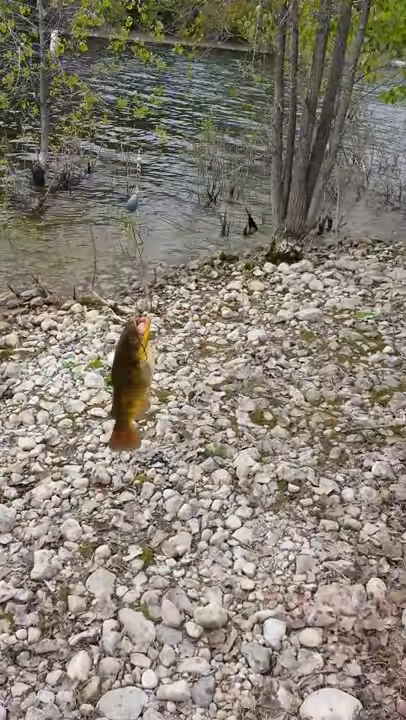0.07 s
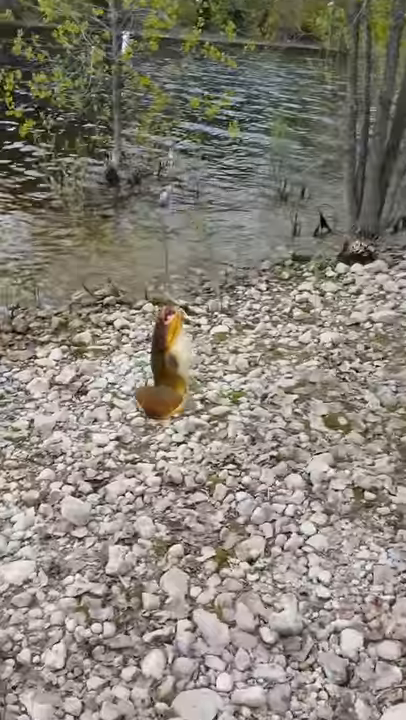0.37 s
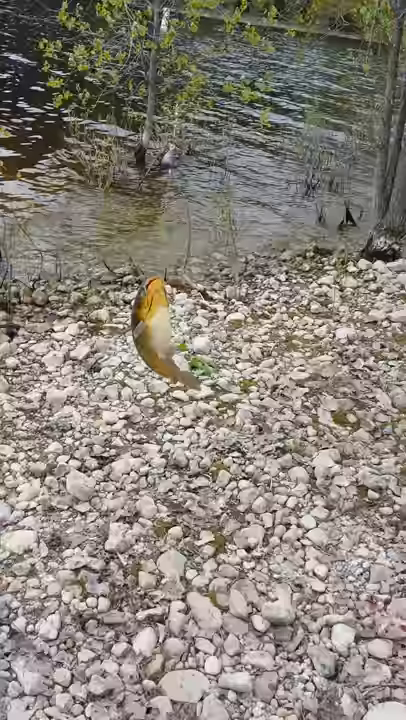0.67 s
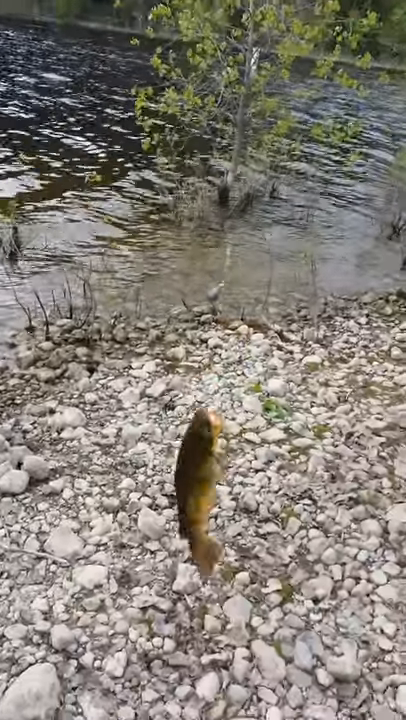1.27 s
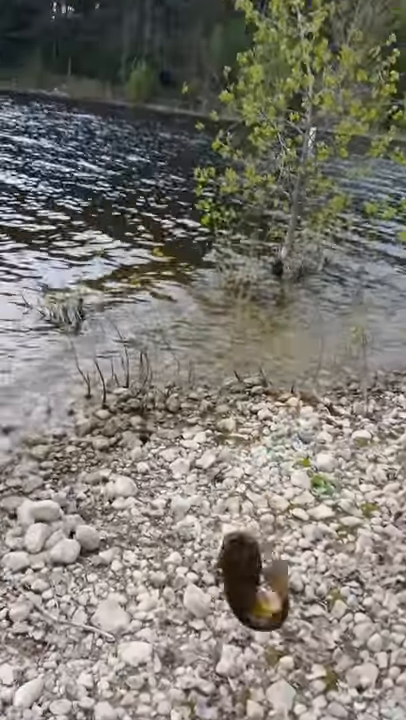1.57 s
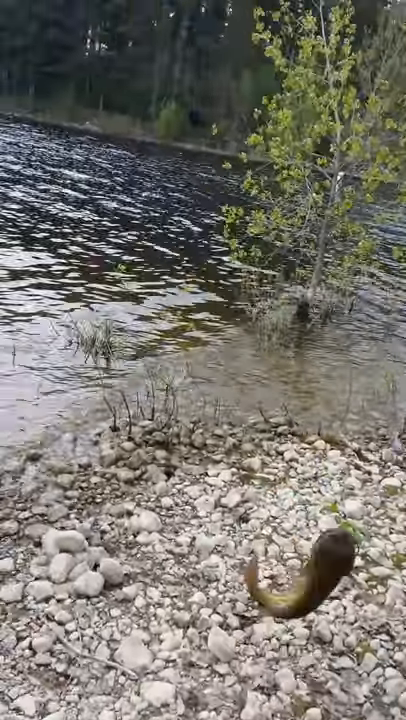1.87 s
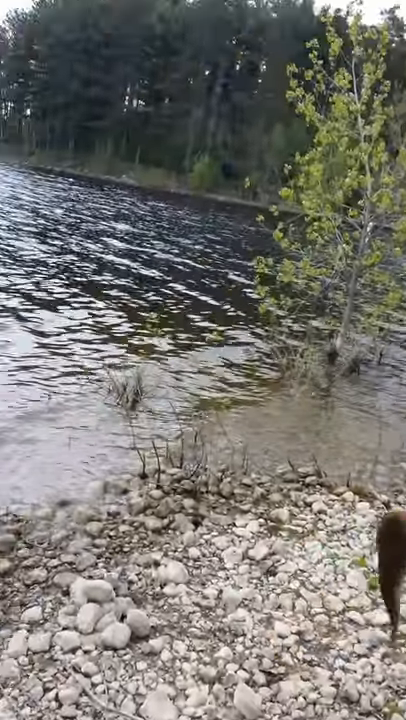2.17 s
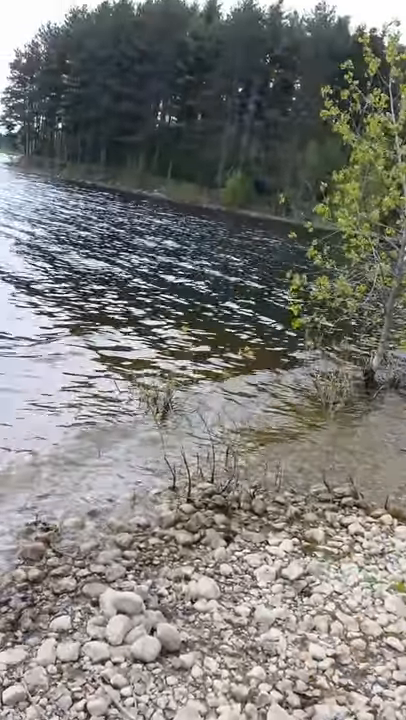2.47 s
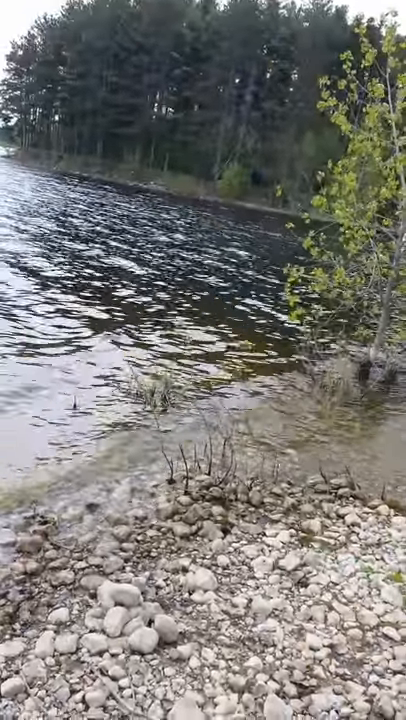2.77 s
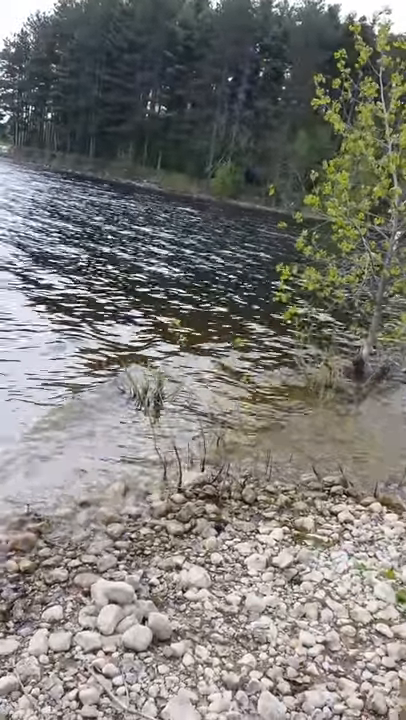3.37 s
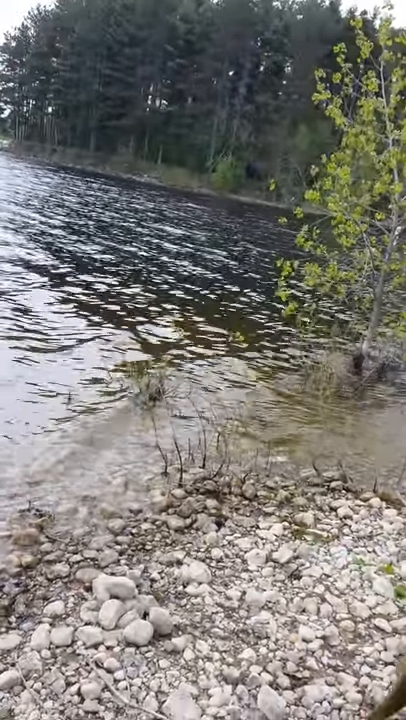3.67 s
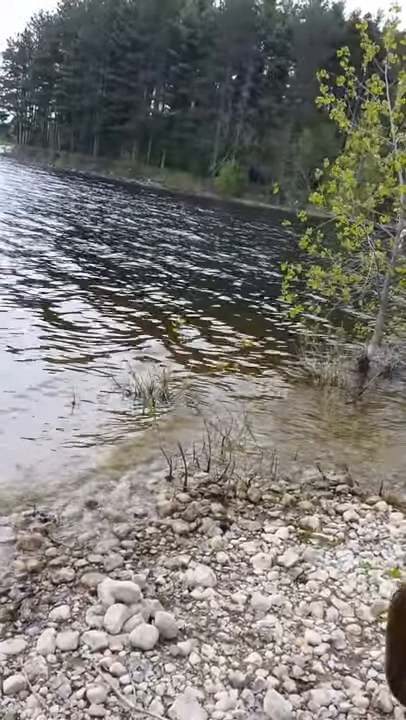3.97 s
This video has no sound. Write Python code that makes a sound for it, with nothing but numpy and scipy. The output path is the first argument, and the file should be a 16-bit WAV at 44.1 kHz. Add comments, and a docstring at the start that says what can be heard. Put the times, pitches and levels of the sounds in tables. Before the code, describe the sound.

A small fishing rod bell jingles irregularly over wind buffeting and softly lapping water.

```python
"""Rod bell on a windy lake shore

A hooked fish swings on a line and shakes the small bell clipped to the rod. Each blow of the pellet
excites the shell's normal modes, which decay freely; between rings the bell clatters drily on its clip.
Wind turbulence buffets the microphone, strongly from about one second on. Behind it, wavelets lap
and hiss on the pebbles, and small air bubbles resonate in the water."""
import sys
import numpy as np
from scipy import signal
from scipy.fft import rfft, irfft, next_fast_len
from scipy.io import wavfile
from scipy.ndimage import uniform_filter1d, map_coordinates

SR = 44100
rng = np.random.default_rng(int(sys.argv[2]) if len(sys.argv) > 2 else 0)


def dump(signal):
    """Clip the signal to [-1, 1] and save it as 16-bit WAV at the path in sys.argv[1]."""
    limited = np.clip(np.atleast_2d(signal).T, -1, 1)
    pcm = np.round(limited * 32767).astype(np.int16)
    wavfile.write(sys.argv[1], SR, pcm)


N = 176400

# Pellet blows: t/s, level/dB of each mode family (hum, low, middle, main, upper),
# lean/dB towards the higher mode of a split pair. Levels in all tables are relative.
PELLET_STRIKES = [(0.2445, -48, -32, -43, -17, -47, -7), (0.2875, -55, -34, -55, -25, -44, -4),
                  (0.7198, -55, -55, -42, -36, -55, 6), (0.9764, -38, -15, -26, -18, -23, -14),
                  (1.169, -55, -51, -29, -15, -34, 10), (1.2865, -55, -30, -55, -55, -48, -2),
                  (1.4437, -35, -35, -38, -16, -34, 2), (1.5298, -48, -25, -32, -19, -29, 2),
                  (1.5795, -55, -48, -31, -16, -32, 2), (1.619, -46, -42, -35, -32, -49, 10),
                  (1.7003, -47, -26, -39, -21, -33, -6), (1.7157, -40, -25, -31, -37, -29, -13),
                  (1.8475, -30, -23, -32, -18, -26, 2), (1.946, -55, -18, -34, -15, -23, 0),
                  (1.9715, -48, -23, -47, -16, -23, -14), (2.0353, -55, -41, -53, -40, -50, -4),
                  (2.3464, -49, -22, -27, -18, -21, 7), (2.4245, -55, -51, -54, -27, -46, 0),
                  (2.6635, -37, -19, -27, -17, -27, 7), (2.691, -39, -43, -25, -17, -21, 12),
                  (2.7475, -54, -39, -55, -33, -39, 7), (2.994, -55, -48, -40, -15, -35, 4),
                  (3.068, -51, -47, -55, -42, -47, 0), (3.238, -55, -30, -55, -55, -40, -1),
                  (3.3025, -55, -55, -46, -33, -55, 10), (3.3487, -26, -25, -27, -16, -31, 3),
                  (3.4224, -22, -22, -25, -19, -19, 2), (3.4485, -42, -34, -31, -23, -35, 4),
                  (3.5338, -52, -55, -43, -37, -48, 1), (3.6481, -55, -55, -47, -43, -55, 4),
                  (3.747, -39, -34, -55, -34, -43, -3), (3.8124, -42, -26, -53, -30, -31, 1)]
# Shell modes: f/Hz, level/dB, T60/s, family (0 hum to 4 upper), place in pair (-1 lower, 1 higher, 0 none)
SHELL_MODES = [(1947, -11, .45, 0, 0), (3417, 0, .25, 0, 0), (3670, -18, .12, 3, 0), (4509, 0, .115, 1, 0),
               (5460, -8, .12, 2, 0), (6793, 0, .2, 2, -1), (7436, 0, .15, 2, 1), (7998, 0, .11, 3, 0),
               (8122, -1, .1, 3, 0), (9025, 0, .105, 4, -1), (9440, 0, .1, 4, 1), (12385, -17, .11, 1, 0),
               (13330, -19, .11, 3, 0), (14228, -18, .1, 2, 1)]
# Impacts of the bell on its clip: t/s, level/dB
CLIP_IMPACTS = [(1.1845, -25), (1.6196, -12), (1.6463, -11), (1.6572, -5), (1.668, -14), (1.6745, -9.5),
                (1.6936, -13), (1.7018, -10), (1.736, -17), (1.7453, -6), (1.7727, -6), (1.7784, -8.5),
                (1.871, -13), (1.92, -18), (1.9285, -13), (2.165, -20), (2.2343, -24), (2.2887, -23),
                (2.3766, -15), (2.4823, -26), (2.5474, -3.5), (2.5564, -21), (2.5672, -7), (2.57, -12),
                (2.5828, -11), (2.5944, -17), (2.6174, -26), (2.679, -12), (2.6845, -12), (2.8464, -21),
                (2.892, -22), (3.0133, -21), (3.268, -21), (3.298, -16), (3.4005, -12.5), (3.5337, -16),
                (3.6483, -21)]
# Clip modes: f/Hz, level/dB, T60/s
CLIP_MODES = [(2250, -15, .04), (3880, -8, .08), (4380, -3, .09), (5270, -6, .08), (5425, -2, .1),
              (5490, -2, .12), (5790, -8, .06), (6490, -1, .09), (6720, -5, .06), (7075, -3, .08),
              (7510, -3, .08), (8000, -7, .05), (10500, -24, .03)]
# Spectrum of contact noise: f/Hz, level/dB
CRACK_SPECTRUM = [(800, -26), (2200, -14), (3000, -15), (4300, -4), (5500, 0), (6800, 0), (8200, -4),
                  (9500, -22), (12500, -30), (15500, -41)]

# Envelopes of the wind's low rumble and of its gusts: t/s, level/dB
RUMBLE_ENVELOPE = [(0.0, -21), (0.18, -45), (0.42, -28.5), (0.69, -53), (0.92, -36.5), (0.98, -47.5),
                   (1.09, -22.5), (1.14, -32), (1.2, -17.5), (2.09, -14), (2.32, -21.5), (2.36, -14.5),
                   (2.44, -25), (2.48, -17), (2.6, -26.5), (2.75, -18), (3.32, -19), (3.4, -15),
                   (3.43, -14.5), (3.48, -15.5), (3.94, -14.5), (4.0, -22)]
GUST_ENVELOPE = [(0.0, -25.5), (0.04, -52), (1.01, -56), (1.07, -38), (1.14, -45), (1.26, -10.5),
                 (1.28, -38), (1.46, -15.5), (1.73, -23), (1.92, -11.5), (1.94, -19), (2.21, -13),
                 (2.25, -27.5), (2.62, -42), (2.92, -22), (2.99, -30), (3.53, -21.5), (3.6, -36),
                 (3.63, -9.5), (3.65, -21), (3.75, -9), (3.89, -18), (3.91, -30), (4.0, -32)]
# Spectra of rumble, gusts and steady breeze: f/Hz, level/dB
RUMBLE_SPECTRUM = [(20, -31), (45, -12), (75, -1), (115, 1), (170, -2.5), (250, -12), (400, -26.5),
                   (800, -69), (2000, -100)]
GUST_SPECTRUM = [(40, -46), (120, -11), (200, 1), (290, -1), (400, -8.5), (520, -18), (700, -26.5),
                 (1100, -43.5), (3000, -80)]
BREEZE_SPECTRUM = [(20, -14), (50, 6.5), (90, -5), (160, -12), (400, -24), (1500, -68)]
# Single eddies that thump the microphone: t/s, level/dB, f/Hz
EDDIES = [(.006, -14, 156), (0.273, -22, 99), (0.398, -12.5, 136), (0.412, -19, 154), (1.258, -1, 244),
          (1.328, -5, 430), (1.33, -2, 195), (1.377, -2.5, 265), (2.171, -7, 332), (2.199, 3.5, 176),
          (2.202, -3, 340), (2.353, -0.5, 135), (2.768, -15, 118), (2.793, -0.5, 140), (3.791, -3, 300)]

# Envelopes of water hissing and lapping on pebbles: t/s, level/dB
HISS_ENVELOPE = [(0.0, -37.5), (1.49, -37), (1.78, -36), (2.07, -38.5), (2.78, -36.5), (3.05, -38.5),
                 (3.33, -38), (4.0, -39.5)]
LAP_ENVELOPE = [(0.0, -42), (0.65, -45), (1.31, -36.5), (2.38, -45), (2.84, -35.5), (2.85, -28),
                (2.86, -39.5), (3.49, -40), (3.71, -50.5), (4.0, -43.5)]
# Spectra of the hiss and the lapping: f/Hz, level/dB
HISS_SPECTRUM = [(200, -25), (600, -2), (1500, -8), (2800, -6.5), (4000, -7), (5200, -4.5), (6500, 1),
                 (7300, -2.5), (8300, -12.5), (9500, -24.5), (12000, -31.5), (15500, -36)]
LAP_SPECTRUM = [(150, 5), (450, -1.5), (750, 0.5), (1100, -5), (1600, 1), (2200, -7), (3200, -9.5),
                (6000, -29), (12000, -33)]
# Bubbles close by: t/s, level/dB, starting f/Hz
NEAR_BUBBLES = [(.299, -20, 1370), (1.073, -21.5, 1450), (1.346, -24, 850), (2.230, -22.5, 1770),
                (2.600, -20, 1470), (2.806, -23.5, 850), (2.848, -16, 1295), (2.924, -18, 1590)]

ATTACK_S = .00034  # time constant of an impact's onset


def bell(strike_db=1.5, contact_db=-.5, bounce_db=-6, bounce_s=.012):
    """Modal excitation: the spot struck weights the shell's modes; contacts and one bounce add clacks."""
    out = np.zeros(N)
    for start, *family_db, lean_db in PELLET_STRIKES:
        modes = []
        for hz, db, t60, family, place in SHELL_MODES:
            pair_share = 1 / (1 + amp(-place * lean_db) ** 2)  # fraction of a split pair's power
            modes.append((hz, db + family_db[int(family)] + 10 * np.log10(2 * pair_share), t60))
        add(out, start, amp(strike_db) * ring(modes))
        force = np.linalg.norm(amp(family_db))
        add(out, start, force * amp(contact_db) * clack())
        rebound = start + bounce_s * (.5 + rng.random())
        add(out, rebound, force * amp(bounce_db) * clack())
    for start, db in CLIP_IMPACTS:
        add(out, start, amp(db) * clack())
    return out


def ring(modes, scatter_db=1.5):
    """Free vibration: a struck body sounds as a sum of damped modes, their levels varying with each blow."""
    hz, db, t60 = np.transpose(modes)
    t = np.arange(SR // 3)[:, None] / SR
    gains = amp(db + scatter_db * rng.standard_normal(len(hz)))
    onset = 1 - np.exp(-t / ATTACK_S)
    return (gains * onset * decay(t, t60) * np.sin(2 * np.pi * hz * t)).sum(1)


def clack(graininess=.82):
    t = np.arange(SR // 3) / SR
    crack = amp(-5.5) * decay(t, t60=.014)
    flutter = np.interp(t, np.linspace(0, t[-1], num=200), rng.standard_normal(200))
    grains = unit(np.exp(graininess * flutter))
    chatter = amp(-19.5) * grains * decay(t, t60=.07)
    noise = coloured(rng.standard_normal(len(t)), CRACK_SPECTRUM)
    onset = 1 - np.exp(-t / ATTACK_S)
    return noise * (crack + chatter) * onset + amp(-18.5) * ring(CLIP_MODES)


def wind():
    """Turbulence: fluctuating pressure at the microphone is heard as breeze, rumble and a rougher roar."""
    breeze = amp(-43.5) * coloured(rng.standard_normal(N), BREEZE_SPECTRUM)
    rumble_db = curve(RUMBLE_ENVELOPE) - .5 + 2 * wobble(knots_per_s=22.13)
    rumble = amp(rumble_db) * coloured(rng.standard_normal(N), RUMBLE_SPECTRUM)
    roar_db = curve(GUST_ENVELOPE) + 3 * wobble(knots_per_s=90)
    roar = amp(roar_db) * coloured(rng.standard_normal(N), GUST_SPECTRUM)
    return breeze + rumble + roar


def eddies(half_width_cycles=.51, roundness=.9):
    """Pressure pulses: each passing eddy thumps the microphone with about one cycle of a low tone."""
    out = np.zeros(N)
    for centre, db, hz in EDDIES:
        cycles = (np.arange(N) / SR - centre) * hz
        envelope = np.exp(-np.abs(cycles / half_width_cycles) ** roundness)
        out += amp(db) * envelope * np.sin(2 * np.pi * (cycles + rng.random()))
    return out


def shore(bubble_count=150, centre_hz=1446):
    """Flow noise: wavelets hiss and lap on pebbles; scattered bubbles follow the lapping's level."""
    lap_db = curve(LAP_ENVELOPE)
    hiss = amp(curve(HISS_ENVELOPE) + .5) * patchy_noise(HISS_SPECTRUM, patch_db=2)
    lapping = amp(lap_db + 3) * patchy_noise(LAP_SPECTRUM, patch_db=4)
    out = hiss + lapping
    for when, pitch, strength in rng.random((bubble_count, 3)):
        db = lap_db[int(when * N)] + 2.5 + 11.7 * strength ** 2
        hz = centre_hz * 2 ** (2 * pitch - 1)  # within an octave either way
        add(out, when * N / SR, amp(db) * bubble(hz))
    for start, db, hz in NEAR_BUBBLES:
        add(out, start, amp(db) * bubble(hz))
    return out


def bubble(hz, cycles=36, chirp=.2):
    """Bubble resonance: trapped air pulsates as a damped oscillator, rising in pitch near the surface."""
    life = cycles / hz
    t = np.arange(int(life * SR)) / SR
    phase = 2 * np.pi * hz * t * (1 + chirp * t / life)
    onset = 1 - np.exp(-t * hz / 2)
    return onset * decay(t, life) * np.sin(phase)


def patchy_noise(spectrum, patch_db):
    """Random modulation: the gain of coloured noise varies in patches of time and frequency."""
    cells = signal.stft(rng.standard_normal(N), nperseg=512)[2]
    patches = uniform_filter1d(rng.standard_normal(cells.shape), size=6, axis=0)
    patches = uniform_filter1d(patches, size=8, axis=1)
    noise = signal.istft(cells * amp(patch_db * unit(patches)), nperseg=512)[1][:N]
    return coloured(noise, spectrum)


def coloured(noise, spectrum):
    """Spectral shaping: noise is filtered by (f/Hz, level/dB) points and scaled to unit rms."""
    hz, db = np.transpose(spectrum)
    f = np.fft.rfftfreq(len(noise), 1 / SR)
    gain = amp(np.interp(np.log(f + 1), np.log(hz), db))
    return unit(irfft(rfft(noise) * gain, len(noise)))


def decay(t, t60):
    """Exponential damping: amplitude falls by 60 dB in t60 seconds."""
    return np.exp(-np.log(1000) * t / t60)


def amp(db):
    """Decibel law: level as an amplitude ratio."""
    return 10 ** (np.asarray(db) / 20)


def unit(x):
    """Normalisation to unit rms."""
    return x / np.sqrt(np.mean(x ** 2) + 1e-20)


def curve(rows):
    """Linear interpolation of (t/s, level/dB) rows at every sample."""
    return np.interp(np.arange(N) / SR, *np.transpose(rows))


def wobble(knots_per_s):
    """Spline interpolation of random knots: a smooth fluctuation."""
    return map_coordinates(rng.standard_normal(2000), [np.arange(N) * knots_per_s / SR], mode="mirror")


def add(track, start, sound):
    """Superposition of a sound on a track, from start in seconds."""
    i = int(np.clip(round(start * SR), 0, N))
    track[i:i + len(sound)] += sound[:N - i]


def scene():
    """Superposition: the pressures of water, wind and bell add at one microphone."""
    return (shore() + wind() + eddies() + bell())[None]


def record(dry):
    """Saturation and band limiting: peaks round off softly, then the highest treble is removed."""
    cutoff_hz = 15700
    rounded = dry / (1 + np.abs(dry) ** 6) ** (1 / 6)
    padded = next_fast_len(N + SR // 2)
    passband = np.fft.rfftfreq(padded, 1 / SR) < cutoff_hz
    return irfft(rfft(rounded, padded) * passband, padded)[..., :N]


dry = scene()
out = record(dry)
dump(out)
```